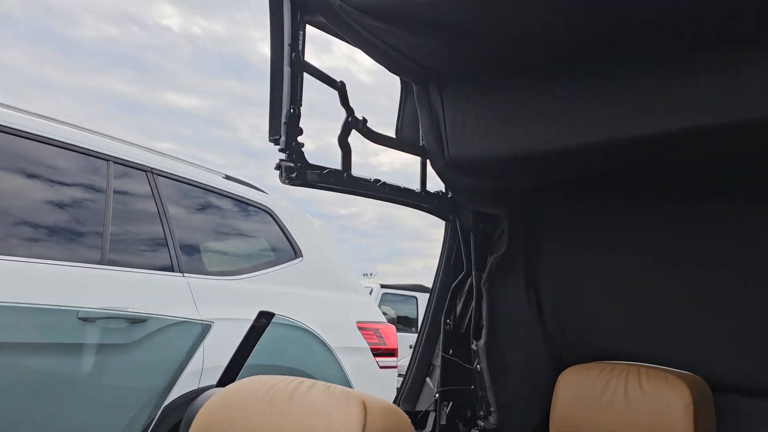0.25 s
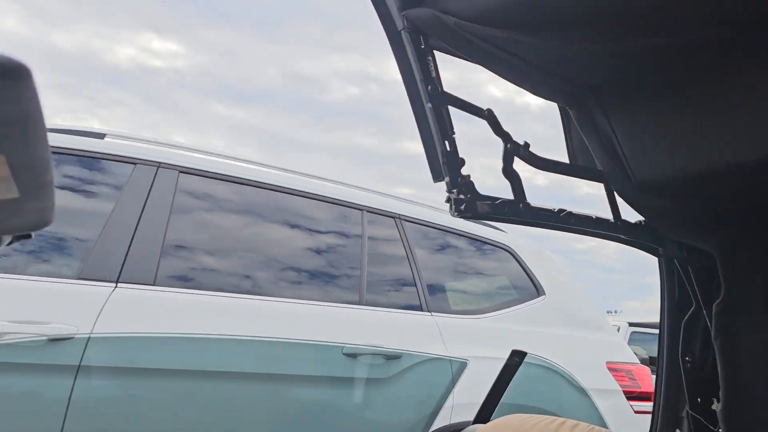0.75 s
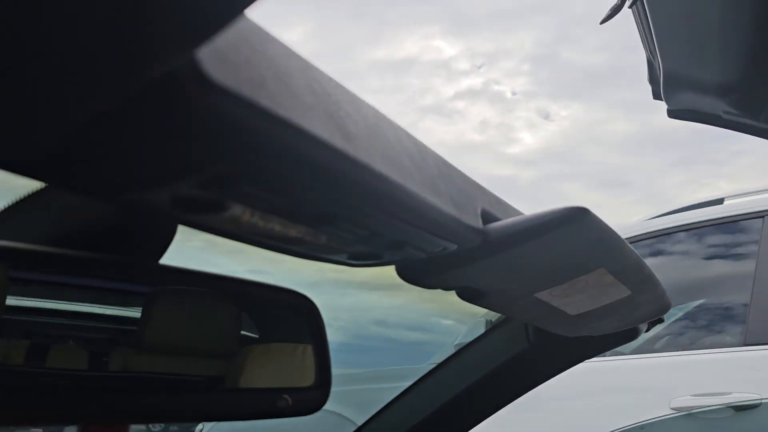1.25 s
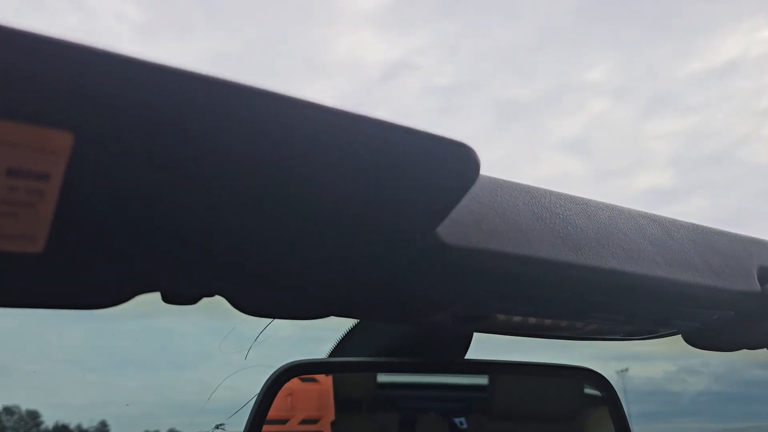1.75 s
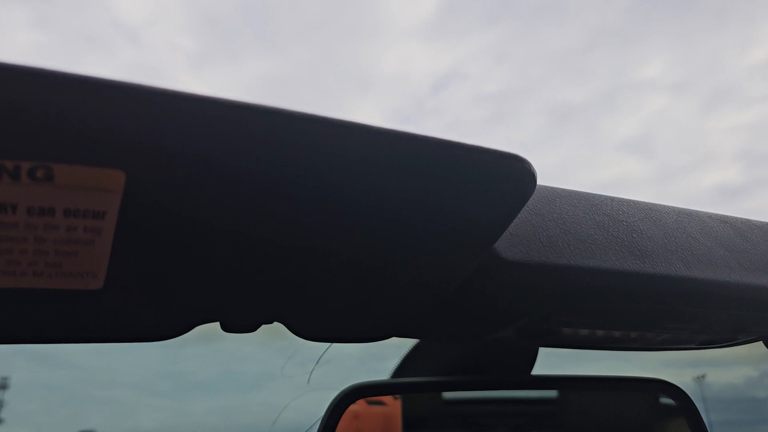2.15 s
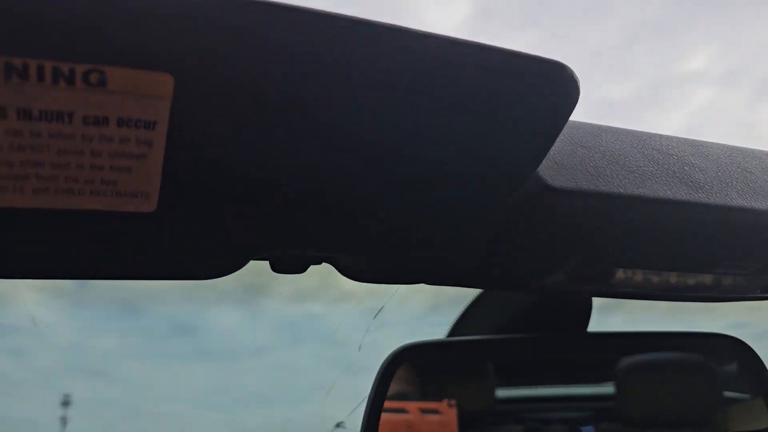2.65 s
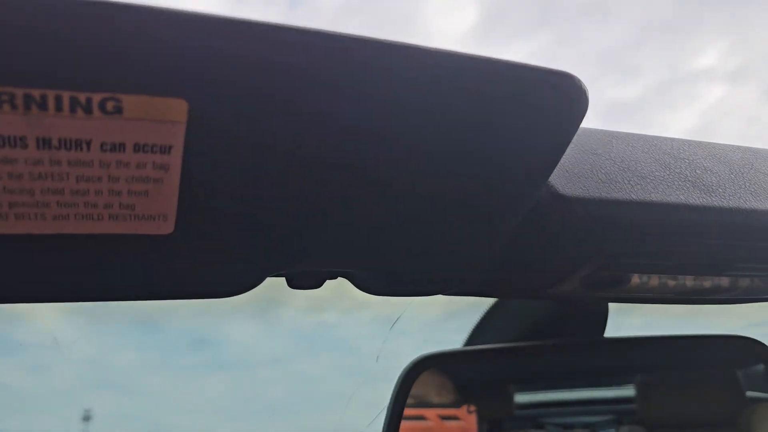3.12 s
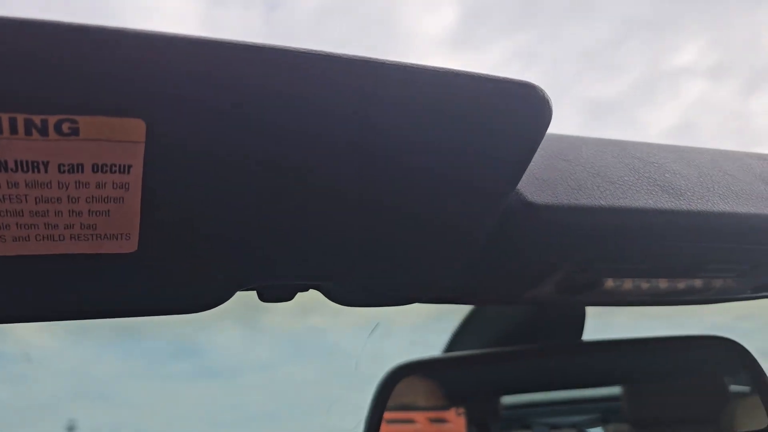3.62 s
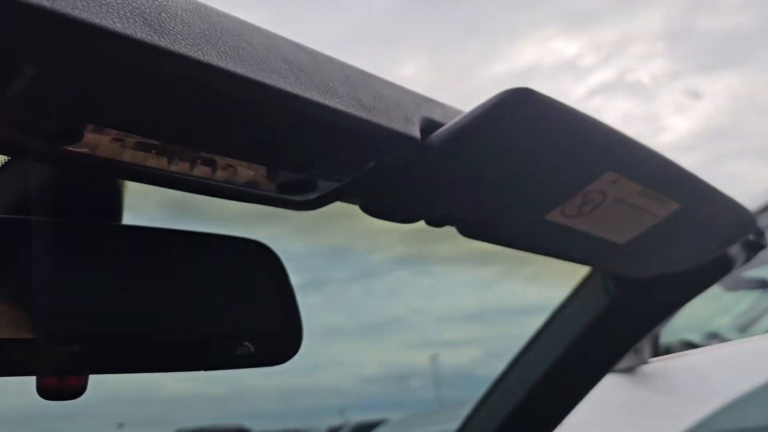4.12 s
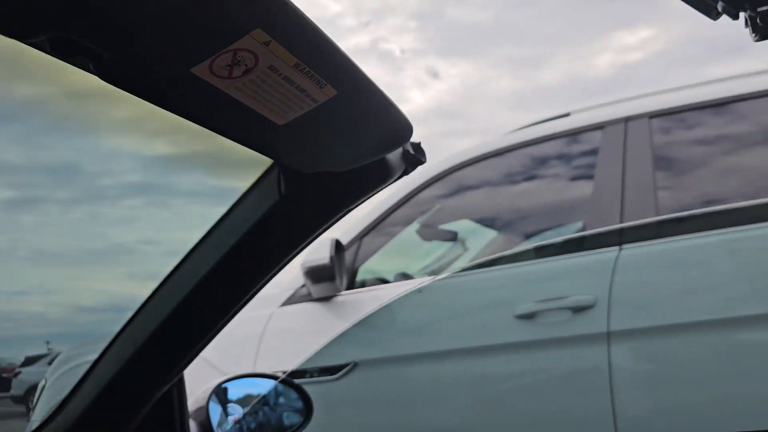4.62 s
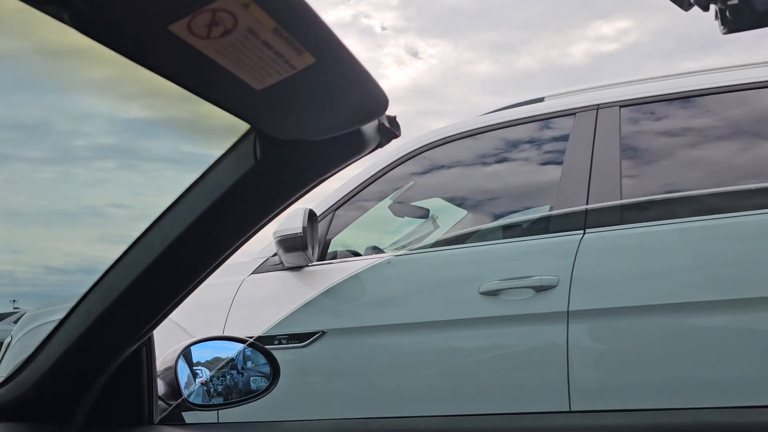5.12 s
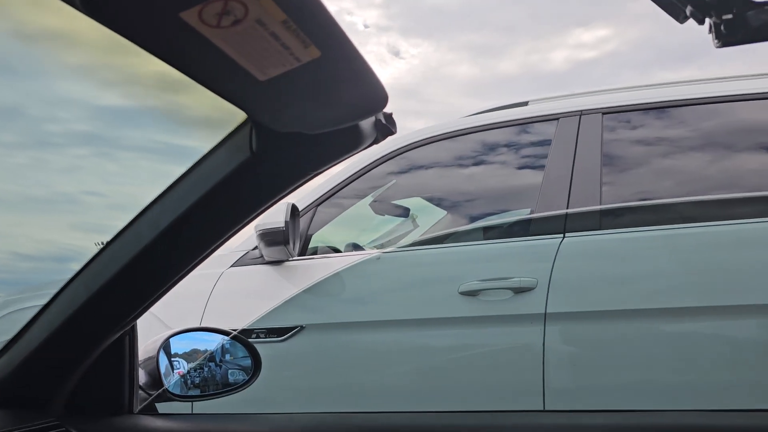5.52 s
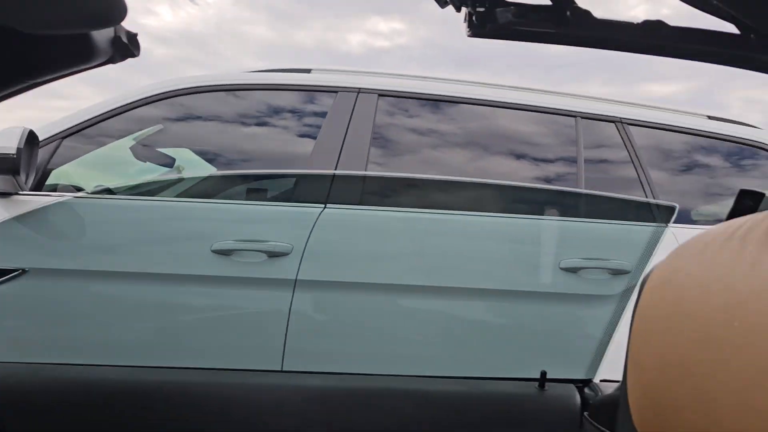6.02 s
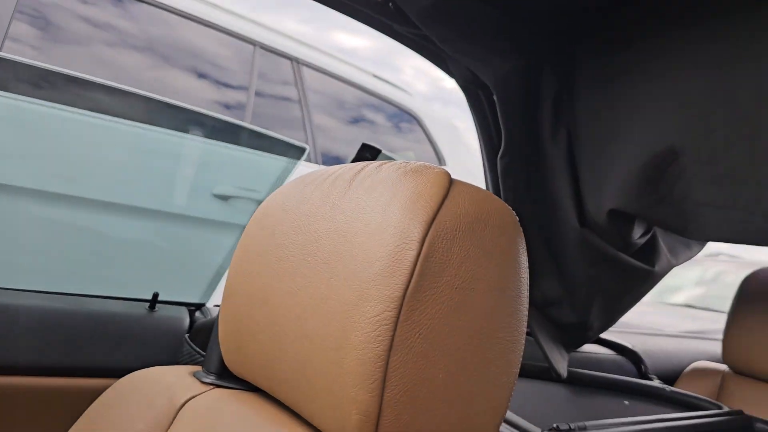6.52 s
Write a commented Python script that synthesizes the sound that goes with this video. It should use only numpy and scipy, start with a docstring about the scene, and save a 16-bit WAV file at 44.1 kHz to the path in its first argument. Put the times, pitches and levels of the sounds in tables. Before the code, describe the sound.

Heard from inside a convertible, an electric pump growls upward in pitch, holds, drops, then rises again, with linkage clunks and a final fabric swish.

```python
"""A convertible's soft top closes overhead, heard from the front seat in an open car park.
First the hydraulic pump's motor drones low, as harmonics of its cycle: six strokes in two unequal sets of three.
A hinge squeaks in gliding tones and the linkage clunks in bursts of ringing noise while the motor speeds up.
It holds over a rush and hiss of filtered noise, then sags; a dry pivot scrapes and the linkage clunks again.
The motor climbs once more, and at the end the fabric swishes, as treble noise, while it is drawn forward."""
import sys
import numpy as np
from scipy import signal
from scipy.fft import rfft, irfft, next_fast_len
from scipy.io import wavfile
from scipy.ndimage import uniform_filter1d, map_coordinates

SR = 44100
rng = np.random.default_rng(int(sys.argv[2]) if len(sys.argv) > 2 else 0)


def file_out(sig):
    """Save sig as 16-bit WAV at sys.argv[1]."""
    # one column per channel
    cols = np.atleast_2d(sig).T
    # limit, then scale
    lim = np.clip(cols, -1, 1)
    pcm = np.round(lim * 32767).astype(np.int16)
    wavfile.write(sys.argv[1], SR, pcm)


N = 298557
TIME = np.arange(N) / SR  # s


def from_db(db):
    """Decibels to gain."""
    return 10 ** (np.asarray(db) / 20)


def rms_one(x):
    """Scale to unit rms."""
    return x / np.sqrt(np.mean(x ** 2) + 1e-20)


def in_time(rows):
    """Each column of a timed curve, read at every sample."""
    seconds, *columns = np.transpose(rows)
    return [np.interp(TIME, seconds, column) for column in columns]


def at_hz(points, hz):
    """Read a spectrum on a log-frequency axis."""
    table_hz, values = np.array(points).T
    return np.interp(np.log(hz), np.log(table_hz), values)


def panned(pan_db):
    """Left and right gains for a left-right level difference."""
    return from_db(np.array([[.5], [-.5]]) * pan_db)


def swell(s, rise_s, fall_s):
    """A rounded rise to 1 at time s, then an exponential fall."""
    before = np.minimum(TIME - s, 0)
    after = np.maximum(TIME - s, 0)
    return np.exp(-(before / rise_s) ** 2 - after / fall_s)


def drift(rate_hz):
    """Slow random wander of rms 1: noise through two equal low-pass poles, run at every 40th sample."""
    step = 40
    pole = np.exp(-2 * np.pi * rate_hz * step / SR)
    white = rng.standard_normal(N // step + 2002)
    slow = signal.lfilter([1], [1, -2 * pole, pole * pole], white)[2000:]  # drop the filter's start
    return np.interp(np.arange(N) / step, np.arange(len(slow)), rms_one(slow))


# how alike the two ears hear a noise: (frequency [Hz], left-right likeness [0 to 1])
EAR_LIKENESS = [(50, 1), (130, 0.57), (260, 0.51), (500, 0.52), (1000, 0.53), (2000, 0.091), (8000, 0.22)]


def noise(spectrum, ripple_db=2.5):
    """Coloured stereo noise of rms 1, rippled above 800 Hz by near reflections, most alike in the bass."""
    size = next_fast_len(N)
    hz = np.maximum(np.arange(size // 2 + 1) * SR / size, 1)
    # steep skirts beyond both ends of the spectrum
    low_skirt = np.minimum(hz / spectrum[0][0], 1) ** 4
    high_skirt = np.minimum(spectrum[-1][0] / hz, 1) ** 4
    grid_hz = np.arange(0, SR / 2, 70)
    ripple = np.interp(hz, grid_hz, rng.standard_normal(len(grid_hz)) * (grid_hz > 800))
    colour = from_db(at_hz(spectrum, hz) + ripple_db * ripple) * low_skirt * high_skirt
    mid, side = rfft(rng.standard_normal((2, size))) * colour
    alike = np.clip(at_hz(EAR_LIKENESS, hz), -1, 1)
    ears = np.sqrt(1 + alike) * mid + np.sqrt(1 - alike) * side * [[1], [-1]]
    return rms_one(irfft(ears, size)[:, :N])


# steady low rumble, dying away at the end: (time [s], level [dB])
RUMBLE_LEVEL = [(0, -30.5), (1.6, -32), (3.6, -29), (4.2, -37), (4.9, -32), (6.2, -38.5), (6.6, -49)]
# the car's body thumps as the roof's weight shifts: (time [s], peak level [dB])
BODY_THUMPS = [(1.35, -24), (1.86, -27), (5.3, -26)]
# colour of rumble and thumps: (frequency [Hz], density [dB per Hz])
RUMBLE_SPECTRUM = [(15, -21), (28, -5), (48, 0), (70, -2), (100, -13.5), (170, -10)]


def rumble():
    """Low noise bed that swells into thumps as the weight of the roof shifts on the body."""
    thumps = sum(from_db(db) * swell(s, rise_s=0.055, fall_s=0.35) for s, db in BODY_THUMPS)
    bed = from_db(in_time(RUMBLE_LEVEL)[0])
    return np.hypot(bed, thumps) * noise(RUMBLE_SPECTRUM)


# rush and hiss before their trims: (time [s], rush level [dB], hiss level [dB])
AIR_LEVELS = [(0.0, -50, -60.5), (0.66, -52.5, -60), (1.24, -48.5, -57), (1.81, -43.5, -56),
              (2.26, -43.5, -57.5), (3.02, -49, -59.5), (3.86, -44.5, -56.5), (4.64, -61.5, -67),
              (4.9, -59.5, -69.5), (5.32, -60, -65.5), (5.68, -47.5, -58.5), (5.98, -55, -61),
              (6.28, -50.5, -59), (6.5, -39, -52), (6.77, -51, -49.5)]
# colour of the rush: (frequency [Hz], density [dB per Hz])
RUSH_SPECTRUM = [(250, 4), (400, 8.5), (510, 3.5), (620, 4.5), (760, 6.5), (930, -4.5), (1100, -1.5),
                 (1380, 2.5), (1700, -3), (2100, -7), (2600, -11), (5000, -24)]
# colour of the hiss: (frequency [Hz], density [dB per Hz])
HISS_SPECTRUM = [(1500, -7.5), (2500, -8), (3000, 0), (3500, 0), (4300, 1.5), (6300, -5.5), (7500, -8),
                 (9500, -16), (13000, -23)]


def air(angle, throb):
    """A rush and a hiss of filtered air noise, with only the faintest throb at the motor's cycle."""
    rush_db, hiss_db = in_time(AIR_LEVELS)
    faint_throb = 1 + throb * (np.sin(3 * angle) + np.cos(angle))
    rush = from_db(rush_db + 4.5) * noise(RUSH_SPECTRUM) * panned(2.7)
    hiss = from_db(hiss_db + 2.0 + 1.1 * drift(30)) * noise(HISS_SPECTRUM)
    return (rush + hiss) * faint_throb


# the fabric slides over the frame:
# (time of peak [s], level [dB], rise [s], fall [s], level of finest fizz against the swish [dB])
FABRIC_SLIDES = [(1.22, -60.5, .36, 0.26, 0), (2.5, -61.5, 0.1, .08, -12.5), (3.9, -64, 0.045, .1, -1.5),
                 (5.62, -60.5, 0.11, 0.68, -22), (6.62, -44.5, 0.13, 1.55, -20)]
# colour of the swish: (frequency [Hz], density [dB per Hz])
SWISH_SPECTRUM = [(3500, -9.5), (5300, 5.5), (7700, 7), (9000, 1.5), (10300, -5), (11800, 3.5), (13200, -5),
                  (15500, -5.5)]
# colour of its finest fizz: (frequency [Hz], density [dB per Hz])
FIZZ_SPECTRUM = [(10500, -12), (12000, -1.5), (15500, -0.5)]
RUSTLE_DB, RUSTLE_FIZZ_DB = -8.5, -9  # rustle against the untrimmed hiss; its fizz against the rustle


def fabric(flicker_db):
    """Cloth dragged over the bows: treble noise that rustles faintly and swishes unevenly with each slide."""
    swish = from_db(in_time(AIR_LEVELS)[1] + RUSTLE_DB)
    fizz = swish * from_db(RUSTLE_FIZZ_DB)
    for s, level_db, rise_s, fall_s, fizz_db in FABRIC_SLIDES:
        slide = from_db(level_db) * swell(s, rise_s, fall_s)
        swish = np.hypot(swish, slide)
        fizz = np.hypot(fizz, slide * from_db(fizz_db))
    flicker = from_db(flicker_db * drift(40))
    return flicker * (swish * noise(SWISH_SPECTRUM) + fizz * noise(FIZZ_SPECTRUM)) * panned(-2.8)


# a hinge squeaks in short rising notes:
# (start [s], length [s], first pitch [Hz], last pitch [Hz], level [dB], pitch waver [fraction])
SQUEAK_NOTES = [(0.696, .125, 638, 646, -45.5, 0.0051), (.808, 0.085, 678, 725, -42, .006)]
# make-up of each note: (harmonic number, level [dB])
SQUEAK_HARMONICS = [(1, 5.5), (2, -3), (3, -5.5), (4, -20)]


def squeak():
    """A hinge sticks and slips: a wavering harmonic tone that rises a little in each note."""
    edge_s = 0.018
    out = 0
    for s, length, first_hz, last_hz, level_db, waver in SQUEAK_NOTES:
        hz = np.interp(TIME, [s, s + length], [first_hz, last_hz]) * (1 + waver * drift(40))
        phase = 2 * np.pi * np.cumsum(hz) / SR
        gate = np.clip(np.minimum(TIME - s, s + length - TIME) / edge_s, 0, 1)
        tone = sum(from_db(db) * np.sin(round(k) * phase) for k, db in SQUEAK_HARMONICS)
        out = out + gate * from_db(level_db) * tone
    return out * panned(2.5)


def resonate(x, hz, width):
    """One two-pole resonance with unit gain at its top; width in Hz."""
    r = np.exp(-np.pi * width / SR)
    feed = np.array([1, 0, -1]) * (1 - r * r) / 2
    return signal.lfilter(feed, [1, -2 * r * np.cos(2 * np.pi * hz / SR), r * r], x)


def chatter(events, modes, slips_per_s, sag_db, slip_s, tail_t60, tail_db):
    """A joint slips in a quick, weakening run; each slip cracks into the metal's modes and echoes briefly."""
    out = np.zeros((2, N))
    t = TIME[:SR // 4]
    for s, level_db, length, low_hz, high_hz, pan_db in events:
        gap_chance, level_chance = rng.standard_normal((2, 32))
        starts = np.r_[0, np.cumsum(np.exp(.3 * gap_chance)) / slips_per_s]
        power = 0
        for start, luck in zip(starts[starts < length], level_chance):
            age = np.maximum(t - start, 0)
            slip = np.exp(-age / slip_s) + from_db(tail_db - 60 * age / tail_t60)
            strength = from_db(2 * luck - sag_db * start / length)
            power = power + ((t >= start) * slip * strength) ** 2
        ring = 0
        for hz, width, db in modes:
            crack = np.sqrt(power) * rng.standard_normal((2, len(t)))  # each mode takes it up its own way
            ring = ring + from_db(db) * resonate(crack, hz, width)
        band = signal.butter(2, [low_hz, min(high_hz, .45 * SR)], "band", fs=SR, output="sos")
        ring = rms_one(signal.sosfilt(band, ring)) * np.sqrt(length / t[-1])  # level refers to the length
        at = round(s * SR)
        out[:, at:at + len(t)] += ring * from_db(level_db) * panned(pan_db)
    return out


# a dry pivot scrapes: (time [s], level [dB], length [s], lowest [Hz], highest [Hz], left-right [dB])
PIVOT_SCRAPES = [(5.221, -45, 0.047, 4500, 15500, -7)]
# modes of the pivot: (frequency [Hz], width [Hz], level [dB])
PIVOT_MODES = [(4500, 2500, -7), (6300, 260, -13), (7500, 630, -8), (9000, 300, -1), (10400, 310, -8),
               (11900, 500, -12), (15000, 350, -5)]


def scrape():
    """Slips so dense that they run together into a scrape of the dry pivot."""
    return chatter(PIVOT_SCRAPES, PIVOT_MODES, slips_per_s=860, sag_db=9,
                   slip_s=.002, tail_t60=0.11, tail_db=-13)


# joints of the linkage slip and chatter:
# (time [s], level [dB], length [s], lowest [Hz], highest [Hz], left-right [dB])
LINKAGE_CLUNKS = [(.705, -39, 0.0018, 7000, 10700, 0), (.764, -53.5, 0.015, 4830, 8500, -5),
                  (.917, -61, .004, 4500, 14000, -8.5), (1.169, -45, .004, 4500, 12000, 1),
                  (1.3155, -25.5, 0.036, 395, 14250, -0.5), (1.3155, -26, 0.013, 1100, 2350, 4),
                  (1.468, -46, 0.014, 2830, 9000, -0.5), (1.5828, -31.5, 0.011, 900, 2400, 0),
                  (1.7394, -51, 0.0044, 8500, 14200, -5), (1.8108, -36.5, 0.01, 890, 2200, 6),
                  (5.228, -42, 0.037, 595, 2340, 4), (5.469, -33.5, 0.009, 280, 2000, 2),
                  (5.4685, -42, 0.016, 3000, 10900, -3), (5.486, -42, 0.011, 1310, 15200, 2)]
# modes of the roof frame: (frequency [Hz], width [Hz], level [dB])
FRAME_MODES = [(330, 41, -6), (555, 140, 18), (750, 110, 4), (1110, 170, 1.5), (1380, 100, 10.5),
               (1600, 140, 0), (2200, 180, 0), (3170, 1100, -5), (4110, 330, -11), (5440, 700, -15),
               (7100, 930, -16), (9300, 450, -20), (12100, 1200, -16.5)]


def clunks():
    """Joints of the linkage let go and set the roof frame ringing."""
    return chatter(LINKAGE_CLUNKS, FRAME_MODES, slips_per_s=220, sag_db=2.5,
                   slip_s=.0017, tail_t60=.14, tail_db=-9)


# oil gurgles in the lines, mostly under the first lift: (time [s], level [dB])
OIL_LEVEL = [(0, -34), (.45, -39.5), (.7, -40.5), (1.05, -38.5), (1.8, -32.5), (2.4, -38.5), (4, -44.5),
             (4.65, -44.5), (4.9, -62), (5.4, -67), (5.7, -37.5), (6.3, -49), (6.77, -54)]
# colour of the gurgle: (frequency [Hz], density [dB per Hz])
OIL_SPECTRUM = [(360, 6), (430, -2), (520, 5.5), (620, -4.5), (740, 1.5), (850, -10.5)]


def gurgle():
    """Oil in the lines: a narrow band of low-mid noise that follows the lift."""
    return from_db(in_time(OIL_LEVEL)[0]) * noise(OIL_SPECTRUM) * panned(1.5)


# load on the pump, which brings out its overtones: (time [s], swing [dB])
PUMP_LOAD = [(0, 0.5), (0.42, -2.5), (0.7, -5), (1, 4.7), (1.3, -0.7), (1.85, -7.5), (2.15, 4.5),
             (2.95, 2.1), (3.35, 8.5), (4, 4.5), (4.2, -11.5), (4.6, -7), (4.95, -29), (5.3, -0.2),
             (5.5, 4), (5.9, 5), (6.3, -3), (6.77, -5.7)]
FULL_SPEED = 40  # motor cycles per s


def driven(speed, level_db, octave_db, load_share):
    """Level in dB of a sound that follows the pump's speed and load."""
    return level_db + octave_db * np.log2(speed / FULL_SPEED) + load_share * in_time(PUMP_LOAD)[0]


# how the bodywork passes the other orders: (frequency [Hz], gain [dB])
BODY_RESPONSE = [(30, -6.5), (90, -3.5), (130, 3), (300, -2.5), (420, -7), (520, -3), (615, 8), (665, 0),
                 (750, 1), (830, -6.5), (920, -6.5), (1080, -16.5), (1300, -8.5), (1520, -21),
                 (2300, -39.5)]


def other_orders(speed, angle, low_db, high_db, accent_db, ripple_db, flutter, left_db, count=56):
    """No two strokes are equal, so every multiple of the cycle sounds, gliding through cabin resonances."""
    grid_hz = np.arange(10, 3000, 28)
    shared = rng.standard_normal(len(grid_hz))
    own = rng.standard_normal((2, len(grid_hz)))
    apart = np.sqrt(np.clip(1 - at_hz(EAR_LIKENESS, grid_hz), 0, 1))
    cabin_db = at_hz(BODY_RESPONSE, grid_hz) + ripple_db * (shared + apart * own)
    cabin = from_db(cabin_db) * panned(left_db * apart)
    ear_phase = apart ** 2 * rng.standard_normal((2, len(grid_hz)))
    low, high = from_db(low_db), from_db(high_db)
    out = np.zeros((2, N))
    for order in np.setdiff1d(np.arange(2, count), [3, 6, 9, 12, 15]):  # those are main orders
        hz = order * speed
        in_set = order % 3 == 0
        upper = np.clip((hz - 280) / 220, 0, 1)  # low buzz gives way to high between 280 and 500 Hz
        gain = (low + upper * (high - low)) * from_db(accent_db * in_set) * (1 + flutter * drift(6.9))
        # the middle orders stay nearly in step and add up to one rasp per cycle
        spread = .7 if 12 < order < 25 else np.pi
        phase = order * angle + rng.standard_normal() * spread
        for ear in range(2):
            ear_gain = gain * np.interp(hz, grid_hz, cabin[ear])
            out[ear] += ear_gain * np.sin(phase + np.interp(hz, grid_hz, ear_phase[ear]))
    return np.sqrt(2) * out  # peak to rms


# the stroke tone, six to a cycle, before its dips: (time [s], level [dB])
STROKE_LEVEL = [(0, -19.5), (.3, -19.5), (.76, -25), (.98, -12.5), (1.52, -13.5), (1.95, -19), (2.25, -15),
                (3.4, -13), (4.02, -11), (4.47, -15), (4.7, -25), (4.82, -41), (5.22, -48), (5.33, -25),
                (5.58, -31), (5.77, -17), (6.1, -18.5), (6.47, -12), (6.77, -13.5)]
# the stroke tone dips briefly: (time [s], dip [dB], half width [s])
STROKE_DIPS = [(.5, -11, .08), (1.87, -15, .075), (3.0, -9, .08), (3.84, -4, .05), (4.41, -9, .02),
               (4.57, -11, .04), (6.22, -10, .04)]
# tones of the two unequal sets of strokes: (order, level at full speed [dB], slope [dB per octave of speed],
# share of the load's swing, strength of their echo, steady rise or fall over the whole scene [dB per s])
SET_TONES = [(3, -29.5, 16, 0.26, 0.082, 0.65), (9, -24, 2, 0.67, 0.11, 1.2),
             (12, -30.5, -0.85, 0.36, 0.1, 0.5), (15, -36, -3, 1, 0.08, -0.62)]
# the cabin's standing waves lift and sink orders 9, 12 and 15: (frequency [Hz], gain [dB])
CABIN_WAVES = [(110, -1.5), (148, 8.5), (170, 1), (195, 6), (220, -1), (245, 0.9), (275, 5), (310, -1.5),
               (345, -3), (420, -1.5), (470, -1.5), (540, -4.5), (590, 2), (640, -1)]
# the listener turns in the seat: (time [s], left-right of the stroke tone [dB], lead of the left ear [ms])
HEAD_TURN = [(0, -1.5, 0.35), (.9, 1.5, 0.26), (1.2, 3, -0.14), (1.55, 10.5, -0.25), (2, -4.5, -0.3),
             (2.9, -2.5, -0.38), (3.3, -2.5, -0.34), (3.8, -1, -0.38), (4.05, -2, -0.25), (5, 4, -0.18),
             (6.1, 2, 0.35), (6.35, 0.5, 0.3), (6.77, 2, 0.39)]
ECHO_S, LIMP_DB = .02085, -20.5  # delay of the echo; order 3 at the height of the limp


def main_orders(speed, angle, limping, flutter, half_pan_db, upper_pan_db):
    """The stroke tone and the orders of the two unequal sets; an echo makes these swell and sink in gliding."""
    pan_db, _ = in_time(HEAD_TURN)
    dips_db = sum(db * np.exp(-((TIME - s) / width) ** 2) for s, db, width in STROKE_DIPS)
    stroke = from_db(in_time(STROKE_LEVEL)[0] + dips_db) * (1 + 0.12 * drift(7.3))
    out = stroke * panned(pan_db) * np.sin(6 * angle + rng.uniform(0, 2 * np.pi))
    for order, *law, echo, db_per_s in SET_TONES:
        order = round(order)
        hz = order * speed
        comb = np.abs(1 + echo * np.exp(-2j * np.pi * hz * ECHO_S))
        gain = from_db(driven(speed, *law) + db_per_s * (TIME - TIME.mean())) * comb
        if order == 3:
            gain = np.hypot(gain, from_db(LIMP_DB) * limping) * panned(half_pan_db)
        else:
            gain = gain * from_db(at_hz(CABIN_WAVES, hz)) * panned(upper_pan_db)
        phase = order * angle + rng.uniform(0, 2 * np.pi) * (order < 12)  # 12 and 15 start in step
        out = out + gain * (1 + flutter * drift(7.3)) * np.sin(phase)
    return np.sqrt(2) * out  # peak to rms


# the motor's run: (time [s], speed [cycles per s])
MOTOR_SPEED = [(0, 18.45), (.2, 17.76), (.43, 16.65), (.6, 17.5), (.92, 20.85), (1.26, 27.2), (1.52, 31),
               (2, 37.2), (2.3, 39.75), (2.56, 41.25), (2.79, 41), (3.04, 38.75), (3.6, 39.15),
               (4.08, 41.35), (4.31, 41.65), (4.48, 36.7), (4.71, 21.7), (4.96, 12.1), (5.26, 12.8),
               (5.43, 11.6), (5.7, 20), (5.97, 26.4), (6.46, 33.6), (6.68, 40.9), (6.77, 42.9)]
# remaining orders, low part: (level at full speed [dB], slope [dB per octave of speed], share of load's swing)
LOW_BUZZ_LAW = (-47.5, 1, 0.44)
# remaining orders, high part: (level at full speed [dB], slope [dB per octave of speed], share of load's swing)
HIGH_BUZZ_LAW = (-49, 19.4, .7)
# churning: (level at full speed [dB], slope [dB per octave of speed], share of load's swing)
CHURN_LAW = (-34.5, 2.2, 0.12)
# colour of the churning: (frequency [Hz], density [dB per Hz])
CHURN_SPECTRUM = [(60, -24.5), (120, -14.5), (220, 9.5), (330, -4), (500, -17), (800, -54)]
# low buzz gains this many dB for each cycle per s per s of changing speed; churning half, high buzz a fifth
SHUDDER_DB = 0.2235
LIMP_RASP_DB = 1.5  # lift of the high buzz at the height of the limp


def motor(speed, angle):
    """The motor's tones over churning and gurgling oil; it shudders as speed changes, limps under the roof."""
    limping = swell(3.02, rise_s=.05, fall_s=.42)  # the roof's weight makes the pump limp for a while
    smooth_speed = uniform_filter1d(in_time(MOTOR_SPEED)[0], size=4410)
    shudder_db = SHUDDER_DB * np.abs(np.gradient(smooth_speed) * SR)
    tones = main_orders(speed, angle, limping, flutter=0.31, half_pan_db=1.5, upper_pan_db=1.5)
    low_db = driven(speed, *LOW_BUZZ_LAW) + shudder_db
    high_db = driven(speed, *HIGH_BUZZ_LAW) + LIMP_RASP_DB * limping + 0.2 * shudder_db
    buzz = other_orders(speed, angle, low_db, high_db, accent_db=5.5, ripple_db=1.22,
                        flutter=0.45, left_db=5.0)
    churn = from_db(driven(speed, *CHURN_LAW) + .5 * shudder_db) * noise(CHURN_SPECTRUM)
    return tones + buzz + churn + gurgle()


def turned(x):
    """The sound reaches one ear before the other as the listener turns: a gliding delay between the ears."""
    _, lead_ms = in_time(HEAD_TURN)
    shift = lead_ms / 2000 * SR  # half the lead for each ear, in samples
    left = map_coordinates(x[0], [np.arange(N) + shift], order=3, mode="mirror")
    right = map_coordinates(x[1], [np.arange(N) - shift], order=3, mode="mirror")
    return np.array([left, right])


def scene():
    """The motor's speed drives its tones over rumble and air; fabric and linkage sound on top."""
    speed = in_time(MOTOR_SPEED)[0] * (1 + 0.0014 * drift(12))
    angle = 2 * np.pi * np.cumsum(speed) / SR
    drone = turned(rumble() + air(angle, throb=0.015) + motor(speed, angle))
    return drone + fabric(flicker_db=1.0) + squeak() + scrape() + clunks()


def record(dry):
    """The sound eases in over 4 ms; the top is cut steeply above 15.8 kHz."""
    ease_in = np.sin(np.pi / 2 * np.minimum(TIME / .004, 1)) ** 2
    top_cut = signal.ellip(10, .2, 80, 15800, fs=SR, output="sos")
    return signal.sosfilt(top_cut, dry * ease_in)


dry = scene()
out = record(dry)
file_out(out)
```